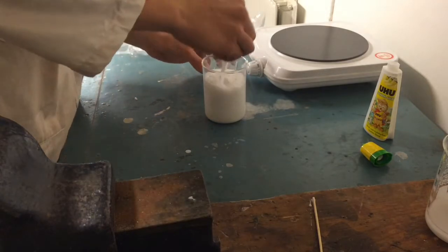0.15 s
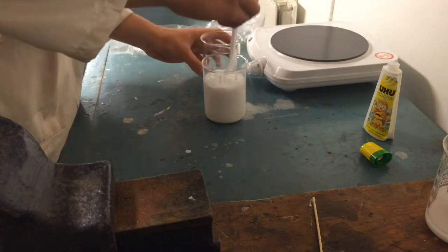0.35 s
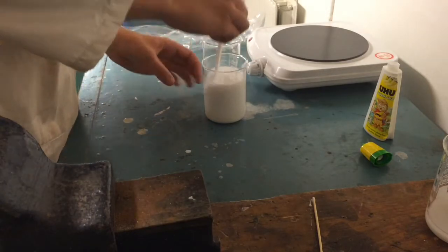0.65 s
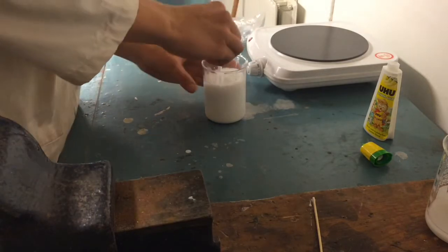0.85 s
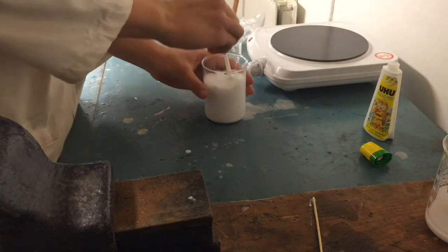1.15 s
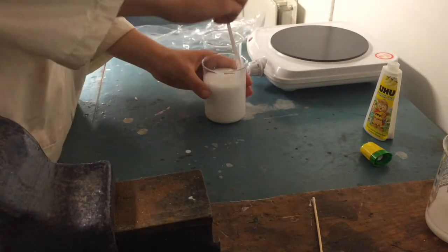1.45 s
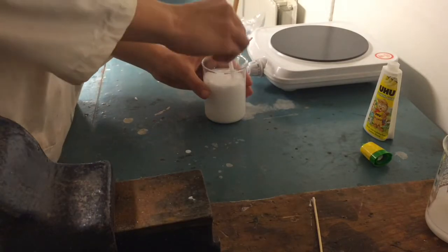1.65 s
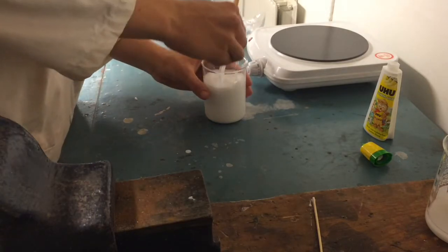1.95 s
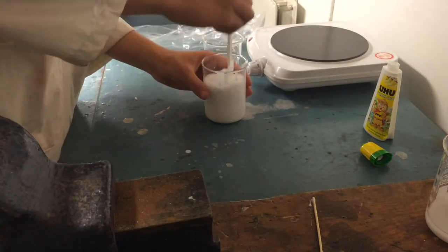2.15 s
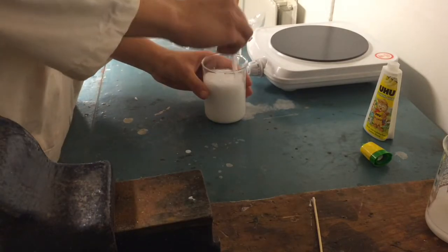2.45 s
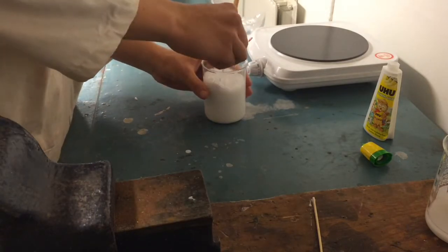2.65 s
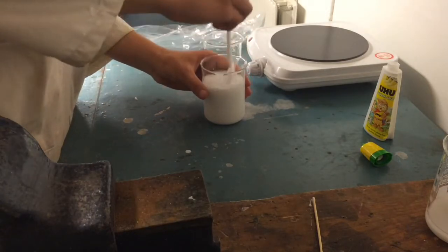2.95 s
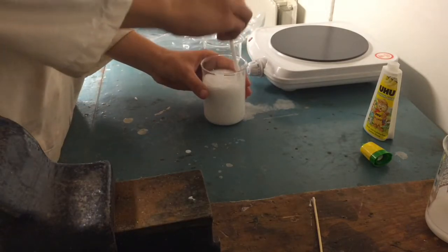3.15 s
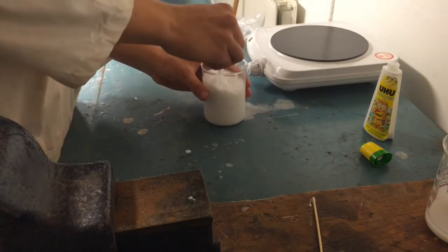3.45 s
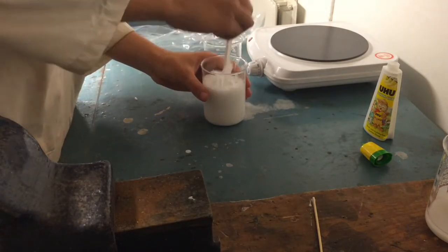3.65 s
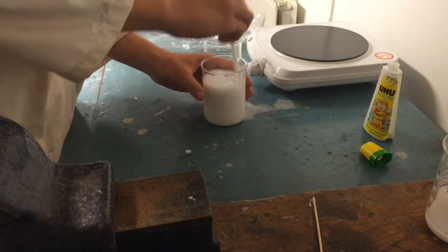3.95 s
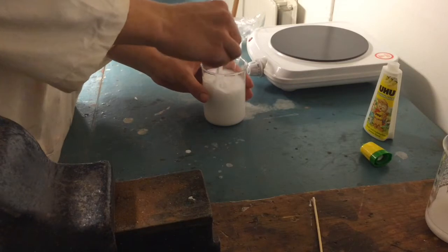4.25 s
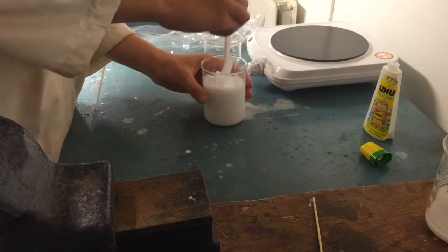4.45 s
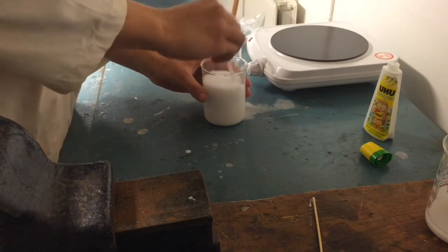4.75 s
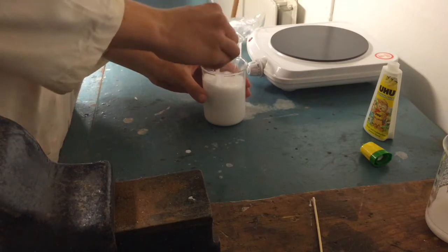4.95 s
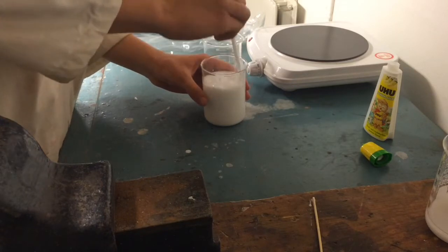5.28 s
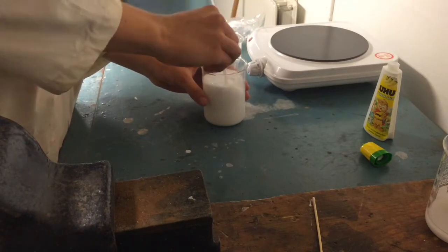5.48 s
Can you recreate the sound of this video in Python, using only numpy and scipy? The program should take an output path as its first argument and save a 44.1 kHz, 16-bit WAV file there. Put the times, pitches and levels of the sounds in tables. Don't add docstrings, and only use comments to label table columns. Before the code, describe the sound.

A spoon stirs thick liquid in a glass beaker, giving irregular dull clinks and scrapes, with one hard bright rap early, in a small room.

```python
import sys
import numpy as np
from scipy import signal
from scipy.fft import rfft, irfft, next_fast_len
from scipy.io import wavfile
from scipy.ndimage import uniform_filter1d

SR = 44100
rng = np.random.default_rng(int(sys.argv[2]) if len(sys.argv) > 2 else 0)


def amplitude_ratio(level_db):
    exponent = np.asarray(level_db, float) / 20
    return 10 ** exponent


def dump_mix(stems):
    frames = np.atleast_2d(stems).T
    limited = np.clip(frames, -1, 1)
    pcm = np.round(limited * 32767).astype(np.int16)
    wavfile.write(sys.argv[1], SR, pcm)


N = 247842
LEAD = SR // 5
ROOM_STEP = SR // 5


def unit(x):
    return x / np.sqrt(np.mean(x ** 2) + 1e-20)


def along(points, hz):
    point_hz, value = np.transpose(points)
    return np.interp(np.log(hz + 1), np.log(point_hz + 1), value)


def coloured(size, gain):
    m = next_fast_len(size)
    spectrum = rfft(rng.standard_normal(m))
    return irfft(spectrum * gain(np.fft.rfftfreq(m, 1 / SR)), m)[:size]


def add(track, start_s, sound):
    part = track[LEAD + round(start_s * SR):][:len(sound)]
    part += sound[:len(part)]


def notes(rows, rise_s, rough):
    track, t = np.zeros(LEAD + N), np.arange(SR // 3) / SR
    for start_s, hz, level_db, t60_s in rows:
        t60_s = max(t60_s, .003)
        bend = 1 + 1.23 * np.exp(-t60_s / 0.045)
        envelope = amplitude_ratio(level_db - 60 * (t / t60_s) ** bend) * (1 - np.exp(-t / rise_s))
        waver = rough * np.cumsum(uniform_filter1d(rng.standard_normal(len(t)), size=64))
        add(track, start_s, envelope * np.sin(2 * np.pi * hz * t + waver))
    return track


def cracks():
    # start_s, crack_db, then low_db, middle_db, top_db relative to the crack
    firm_contacts = [(-.06, -32.5, 1, -9.5, -15.5), (0.2215, -44, 19, 6.5, -13), (.333, -55, 31, -13, -15),
                     (.3454, -54.5, 20, -17, -7), (.6545, -17, -40, -16.5, -13), (0.8883, -39, 1, 2, -13),
                     (.9009, -31.5, -3, -9.5, -10), (.9076, -34, -22, -22, -13), (0.9281, -43.5, 8, -5, -5),
                     (1.5415, -37, -30, -30, -3.5), (1.7654, -43, 5.5, -19, -15),
                     (1.9126, -27, -12, -14, -13.5), (2.3706, -28.5, -15.5, -31.5, -9.5),
                     (2.5925, -39.5, -15, -10, -7.5), (3.05, -49.5, -5, -4.5, -6),
                     (3.0743, -46, -16, -10, -9.5), (3.3871, -38.5, -4.5, -8.5, -9),
                     (3.473, -53, -36, -27.5, -23.5), (3.5242, -42, -13, -13.5, -9.5),
                     (3.9242, -34, -2.5, -1.5, -10), (4.1954, -45.5, 0, -8.5, -6),
                     (4.6625, -54, 5, 1.5, -11), (4.9706, -50.5, -24.5, -27, -5),
                     (5.5474, -32, -13.5, -16.5, -6)]
    # start_s, crack_db, top_db relative to the crack
    light_grazes = [(.4188, -65, -14), (.6874, -37, -16), (1.7714, -52, 6), (2.6114, -54, 1.5),
                    (3.0936, -60, -7), (3.2222, -57, -4), (3.236, -58.5, -5), (4.3261, -54.5, -10),
                    (4.7017, -53, -3.5), (4.7174, -63, 1), (5.3616, -67, 7), (5.3855, -53, -6.5),
                    (5.455, -57.5, -9.5), (5.592, -56, -18), (5.6104, -57, -11)]
    corner_hz = [200, 600, 1200, 2400, 3800, 7000, 10500, 15000]
    graze_low_db, graze_mid_db = -11, -7.5
    t60_at_45_s, shorter_per_db = 0.027, 0.0038
    rise_s = .0007
    near, spread = np.zeros(LEAD + N), np.zeros(LEAD + N)
    t = np.arange(SR // 20) / SR
    grazes = [(start_s, db, graze_low_db, graze_mid_db, top_db) for start_s, db, top_db in light_grazes]
    for start_s, db, low_db, mid_db, top_db in firm_contacts + grazes:
        corner_db = [low_db - 5.5, low_db + 5, mid_db + 5.5, mid_db + 8.5, 0, -1.5, top_db + 2.5, top_db - 5.5]
        shape = list(zip(corner_hz, corner_db))
        colour = lambda hz: amplitude_ratio(along(shape, hz)) * (hz > 150)
        t60_s = np.clip(t60_at_45_s * (1 - shorter_per_db * (db + 45)), .003, .08)
        fall_db = 60 * (t / t60_s) ** 1.43
        envelope = amplitude_ratio(db - 5 - fall_db) * np.minimum(t / rise_s, 1)
        add(near, start_s, envelope * coloured(len(t), colour))
        pulse = np.fft.fftshift(irfft(colour(np.fft.rfftfreq(256, 1 / SR))))
        add(spread, start_s, np.linalg.norm(envelope) * pulse)
    return near, spread


def choked():
    # start_s, lower_hz, level_db, upper_db relative to the lower note
    pressed_pairs = [(-.06, 3440, -48, 15), (.222, 3230, -42, -2.5), (.222, 8400, -50.5, -15),
                     (.655, 3050, -32, -17), (.655, 6420, -27, -13), (.655, 9230, -29, -4),
                     (.901, 4280, -41, 4.5), (.901, 6120, -40, -16), (.9, 8500, -46, -12),
                     (.908, 3450, -37, -15), (1.541, 6350, -39, -0.3), (1.912, 2090, -46, -5),
                     (1.913, 3600, -35, -5), (1.919, 3940, -39, -15), (2.371, 5600, -39, -6),
                     (3.05, 5620, -59, -12), (3.074, 5530, -55, -12), (3.473, 3560, -43.5, -1),
                     (3.927, 2246, -39, -12), (3.925, 3850, -37, -3), (3.925, 7140, -39, -6.5),
                     (4.97, 6440, -50.5, -12), (5.385, 5590, -61, -12), (5.548, 2560, -42.5, -5),
                     (5.547, 4120, -42.5, -5), (5.547, 7340, -43, 3.5)]
    # mode_hz, mode_db
    base_modes = [(900, -10.5), (1160, -4), (1380, -7.5), (1550, 1.8), (1730, -6.5), (1920, -3)]
    # start_s, level_db
    base_scrapes = [
        (.889, -55.5),
        (1.919, -52.5),
        (2.373, -58.5),
        (3.927, -40),
        (4.662, -54),
    ]
    pair_ratio = 1.222
    cycles_at_4k, cycles_grow, most_cycles = 33.3, .7, 44
    pairs = [(start_s, hz * pair_ratio ** k, db + k * up_db)
             for start_s, hz, db, up_db in pressed_pairs for k in range(2)]
    base = [(start_s, hz, db + mode_db) for start_s, db in base_scrapes for hz, mode_db in base_modes]
    cycles = lambda hz: min(cycles_at_4k * (hz / 4000) ** cycles_grow, most_cycles)
    rows = [(start_s, hz, db, cycles(hz) / hz) for start_s, hz, db in pairs + base]
    return notes(rows, rise_s=0.00033, rough=0.12)


def glass():
    # mode_hz, t60_s
    wall_modes = [
        (972, 0.19),
        (2142, .068),
        (4520, .048),
        (4600, .011),
    ]
    # start_s, then mode_db for each of the four
    wall_taps = [(-.06, -63, -62, -79.5, -60), (.222, -80, -80, -80, -47), (.655, -66, -80, -80, -35),
                 (1.541, -68.5, -80, -80, -47), (1.766, -82, -62, -80, -64), (1.913, -77, -65, -70, -38.5),
                 (2.372, -70, -80, -80, -50), (2.593, -68, -68, -80, -52), (3.078, -79, -82, -61.5, -70),
                 (3.387, -76, -50, -66, -44), (3.525, -72, -67, -48, -60), (3.924, -54, -55, -56, -32.5),
                 (4.195, -84, -59, -75, -54.5), (4.326, -80, -80, -61, -71), (4.663, -65.5, -78, -80, -61),
                 (4.702, -70.5, -80, -80, -75), (5.548, -62, -43, -57, -43), (5.592, -80, -70, -70, -50.5)]
    # mode_hz, level_db, t60_s
    rim_modes = [(2518, -41, .17), (2690, -50, .04), (2900, -44, .16), (3190, -49, .06), (3690, -46, .03),
                 (4575, -41, .16), (5440, -43, 0.036), (6630, -26, 0.016), (6470, -46, .12),
                 (7430, -41, .02)]
    # start_s, pitch_hz,
    # level_db, t60_s
    stray_notes = [(.415, 3880, -68, .26), (2.594, 2880, -53, .11), (3.387, 3160, -58, .068),
                   (3.473, 3260, -54, .04), (4.97, 5900, -58, 0.037), (1.919, 3930, -51, .09),
                   (3.925, 7190, -50, .06), (3.926, 3790, -52, .06), (2.375, 5510, -53, .07),
                   (2.375, 1856, -65, .06), (2.62, 569, -58, .25), (5.548, 8900, -50, .05),
                   (5.548, 2200, -44, .08), (5.548, 5400, -52, .04), (3.925, 4350, -44, .02),
                   (.66, 970, -66, .6)]
    rim_s = .655
    twin_ratio, twin_db, twin_life, twin_lag_s = 0.96, 2.5, 0.46, 0.003995
    wall = [(start_s, hz, db, t60_s)
            for start_s, *levels_db in wall_taps for db, (hz, t60_s) in zip(levels_db, wall_modes)]
    lowest = wall[::len(wall_modes)]
    twins = [(start_s + twin_lag_s, hz * twin_ratio, db + twin_db, t60_s * twin_life)
             for start_s, hz, db, t60_s in lowest]
    rim = [(rim_s, *mode) for mode in rim_modes]
    return notes(wall + twins + rim + stray_notes, rise_s=.0005, rough=0.051)


def bench():
    # mode_hz, level_db, t60_s
    top_modes = [(110, -46, .15), (240, -48, 0.03), (295, -30, .12), (354, -31, .16), (557, -42, .035),
                 (755, -9.5, .0095), (748, -33, .4), (818, -39, .22), (585, -42, .15), (661, -43.5, 0.18),
                 (882, -43, .15), (1188, -39.5, .071), (1480, -44, 0.028)]
    # start_s, plank_db, foot_hz, foot_db
    light_knocks = [(-.06, -49, 470, -39.5), (.065, -71, 473, -53), (.698, -49.5, 510, -75),
                    (.889, -67, 522, -44), (.929, -48.5, 624, -54), (1.766, -70, 501, -49),
                    (1.913, -47.5, 510, -50), (2.595, -46.5, 527, -43.5), (2.62, -71, 564, -63),
                    (3.39, -52.5, 431, -65), (3.53, -60, 500, -70), (4.198, -52.5, 524, -66),
                    (4.663, -61.5, 600, -65.5), (5.552, -49.5, 516, -69)]
    set_down_s = .221
    plank_hz, plank_t60_s, foot_t60_s = 288, .055, .035
    plank_lag_s = .002
    top = [(set_down_s, *mode) for mode in top_modes]
    plank = [(start_s + plank_lag_s, plank_hz, db, plank_t60_s) for start_s, db, _, _ in light_knocks]
    foot = [(start_s, hz, db, foot_t60_s) for start_s, _, hz, db in light_knocks]
    return notes(top + plank + foot, rise_s=.0012, rough=0.013)


def tail():
    # band_hz, t60_s
    decay_times = [(150, 0.43), (400, 0.76), (1000, 0.46), (3000, 0.47), (7000, 0.51), (14000, 0.43)]
    # band_hz, room_db
    room_levels = [(150, -6), (500, -7.5), (1500, 0), (4000, -8.5), (8000, -12), (14000, -11)]
    # delay_s, level_db
    wall_echoes = [
        (.0068, -9),
        (.0125, -16),
        (.021, -16.5),
        (.033, -25),
    ]
    hz, t, z = signal.stft(rng.standard_normal(SR * 2 // 3), SR, nperseg=256)
    t60_s = along(decay_times, hz)[:, None]
    level_db = along(room_levels, hz)[:, None] - 60 * t / t60_s
    late = signal.istft(z * amplitude_ratio(level_db) / np.sqrt(t60_s), SR, nperseg=256)[1]
    fade_in = np.clip((np.arange(len(late)) / SR - .004) / 0.00755, 0, 1)
    late = late * fade_in * np.sqrt(6 * np.log(10) / SR)
    for delay_s, db in wall_echoes:
        scatter = np.hanning(160) * coloured(160, lambda f: 1 / np.hypot(1, f / 9000)) / 8
        late[round(delay_s * SR):][:160] += amplitude_ratio(db) * scatter
    return late


def room(source, tails):
    wet = np.zeros(LEAD + N)
    for k, answer in zip(range(0, LEAD + N, ROOM_STEP), tails):
        add(wet, (k - LEAD) / SR, signal.fftconvolve(source[k:k + ROOM_STEP], answer))
    return wet


def rumble():
    # time_s, level_db
    swells = [
        (0.0, -80),
        (0.09, -85),
        (2.28, -71),
        (2.68, -82),
        (4.82, -75.5),
        (4.85, -82),
        (5.62, -79),
    ]
    time_s, db = np.transpose(swells)
    deep = coloured(N, lambda hz: 1 / (1 + ((hz - 52) / 14) ** 4))
    return amplitude_ratio(np.interp(np.arange(N) / SR, time_s, db) - 1.5) * unit(deep)


def floor():
    # point_hz, level_db per Hz
    air_colour = [(13, -44), (40, -6), (204, -5.5), (270, -9.5), (976, -14.5), (1570, -18.5),
                  (14700, -29.5), (16000, -32)]
    # line_hz, width_hz, level_db (rms)
    mains_lines = [(98.2, 5.8, -78), (152.5, 6, -87), (198, 5.13, -82), (294.8, 5.2, -86),
                   (393.7, 5.1, -89), (507.7, 3.6, -89)]
    air_db, swish_db, settles_db_per_s = -70.5, 3, 0.63
    z = signal.stft(coloured(N, lambda hz: amplitude_ratio(along(air_colour, hz))), nperseg=512)[2]
    drift = uniform_filter1d(uniform_filter1d(rng.standard_normal(z.shape), 8, 0), 14, 1)
    air = unit(signal.istft(z * amplitude_ratio(0.69 * unit(drift)), nperseg=512)[1][:N])
    hum = np.zeros(N)
    for line_hz, width_hz, db in mains_lines:
        hum += amplitude_ratio(db) * unit(coloured(N, lambda hz: 1 / (1 + ((hz - line_hz) / width_hz) ** 2)))
    return amplitude_ratio(air_db + swish_db - settles_db_per_s * np.arange(N) / SR) * air + hum


def scene():
    choked_room_db, crack_room_db = -1, .8
    near, spread = cracks()
    pressed, free = choked(), glass() + bench()
    tails = [tail() for _ in range(0, LEAD + N, ROOM_STEP)]
    to_room = free + amplitude_ratio(choked_room_db) * pressed + amplitude_ratio(crack_room_db) * spread
    contacts = free + pressed + near + room(to_room, tails)
    contacts = signal.sosfilt(signal.butter(2, 200, "high", fs=SR, output="sos"), contacts)
    return (contacts[LEAD:] + rumble() + floor())[None]


def top_cut(x):
    return signal.sosfilt(signal.butter(12, 16370, fs=SR, output="sos"), x)


def record(dry):
    hz = np.fft.rfftfreq(N, 1 / SR)
    shelf = .05 * (hz < 16350)
    band = 1 / (1 + (hz / 15450) ** 200)
    mix = irfft(rfft(dry) * (shelf + band), N)
    return top_cut(mix)


dry = scene()
out = record(dry)
dump_mix(out)
```